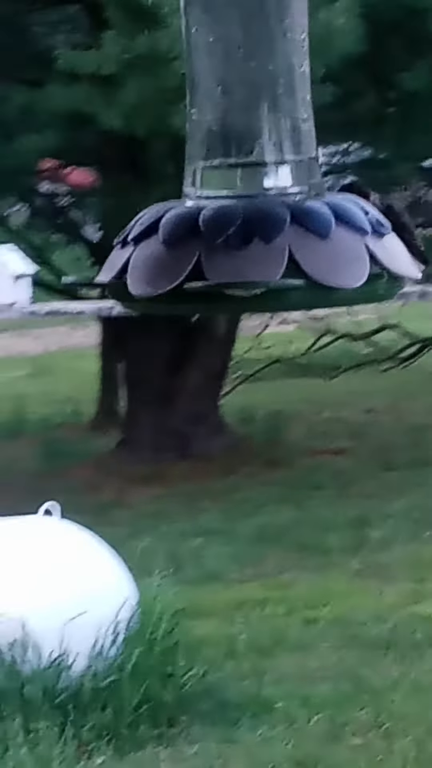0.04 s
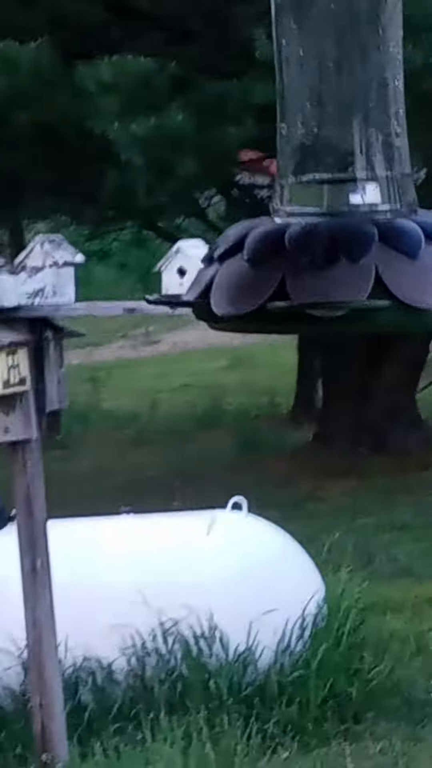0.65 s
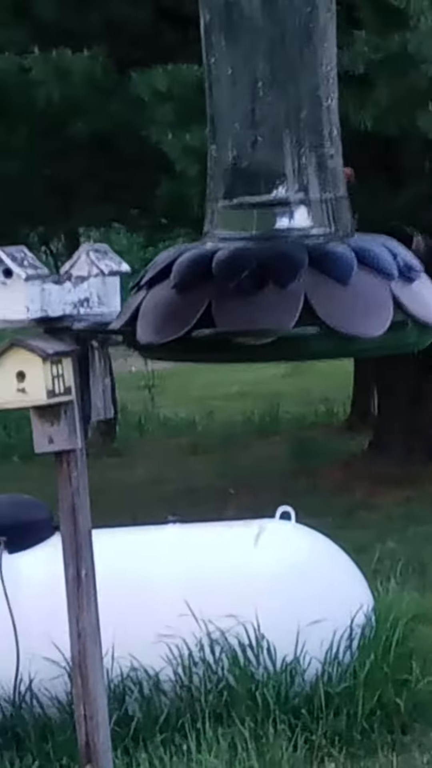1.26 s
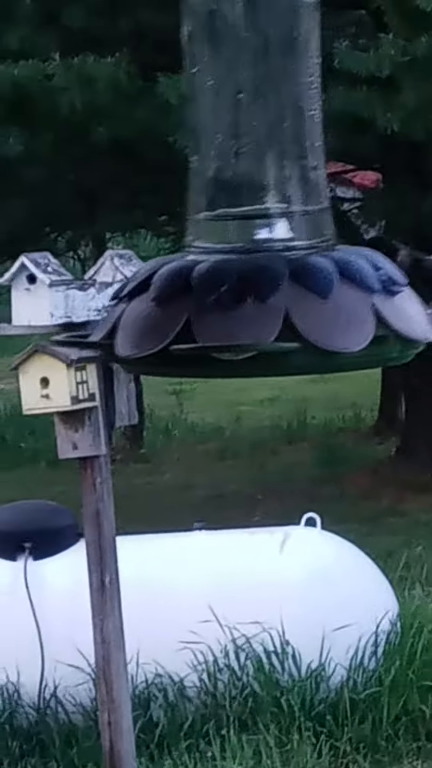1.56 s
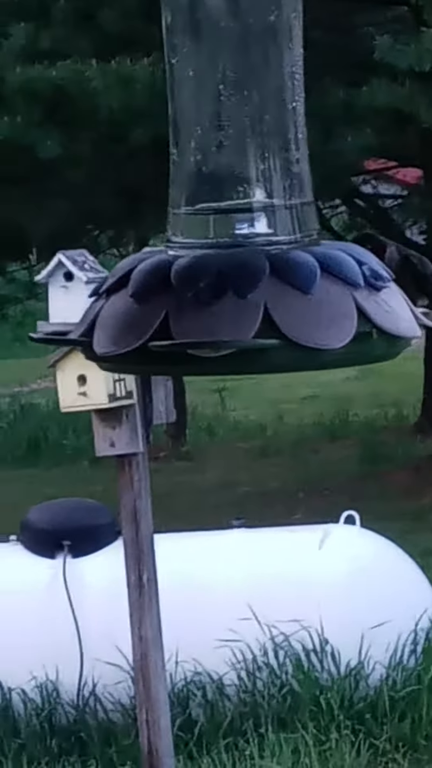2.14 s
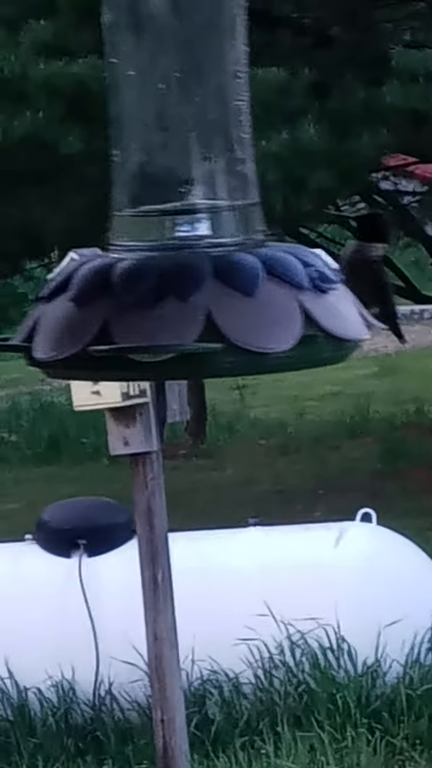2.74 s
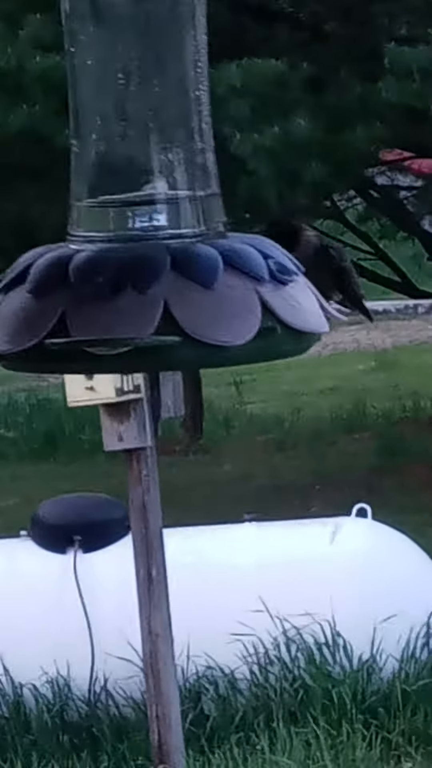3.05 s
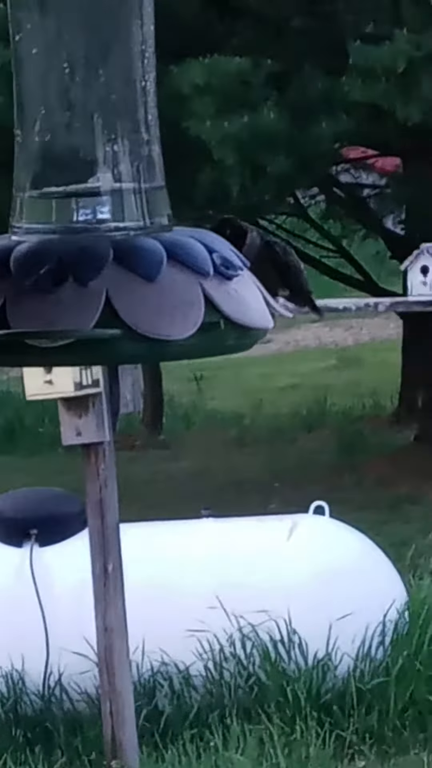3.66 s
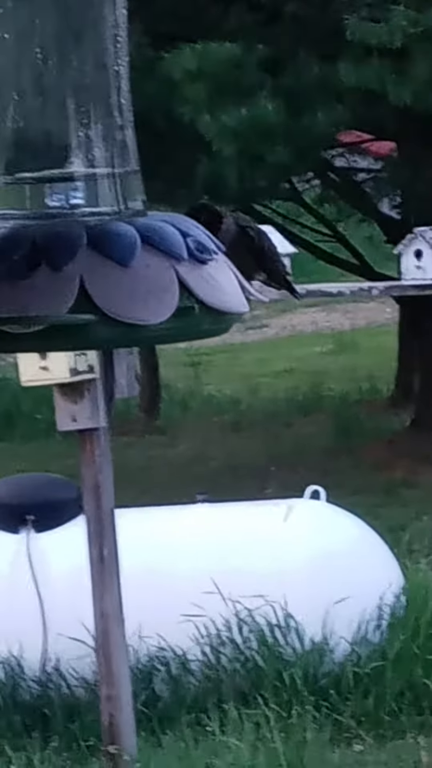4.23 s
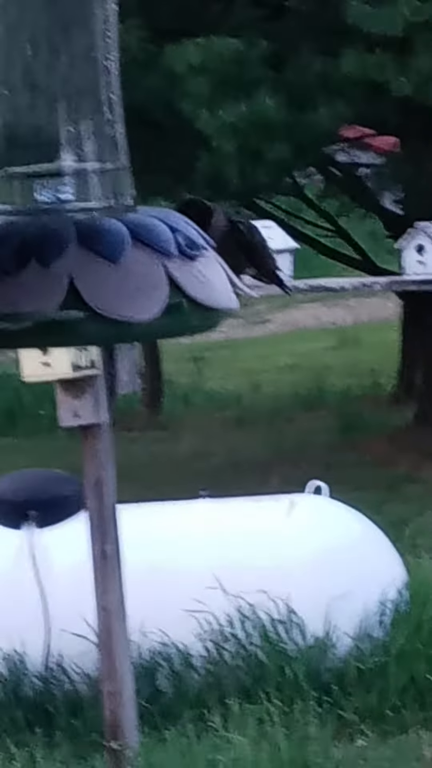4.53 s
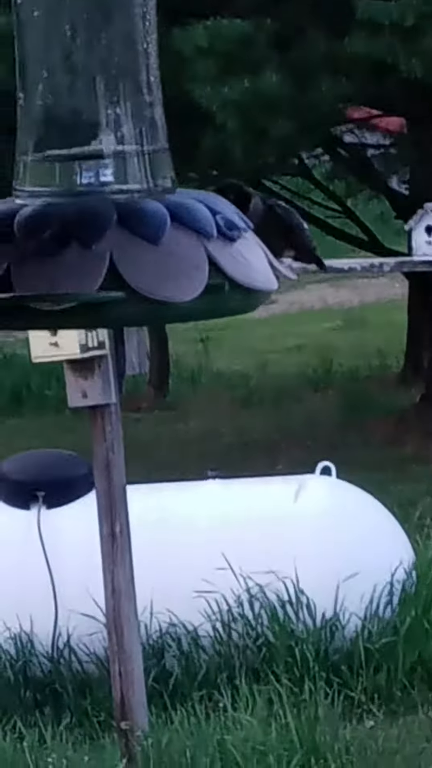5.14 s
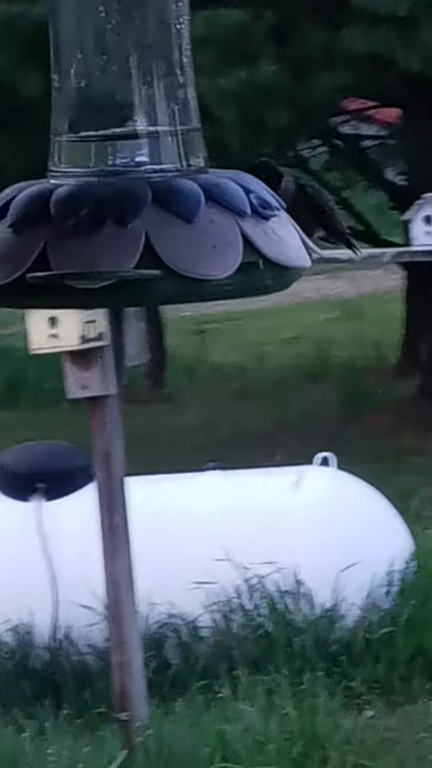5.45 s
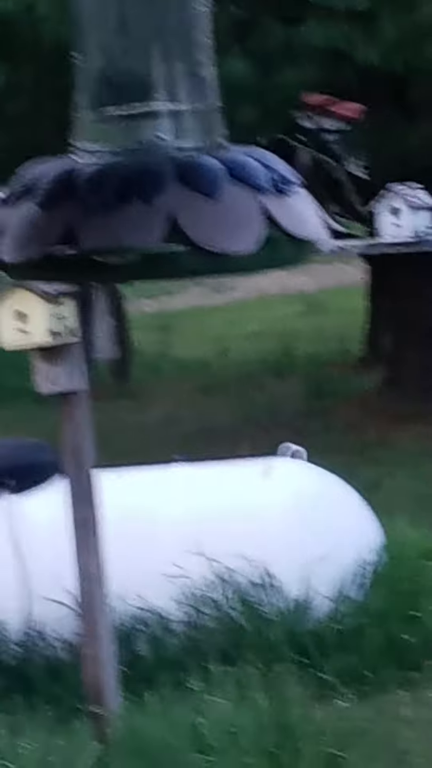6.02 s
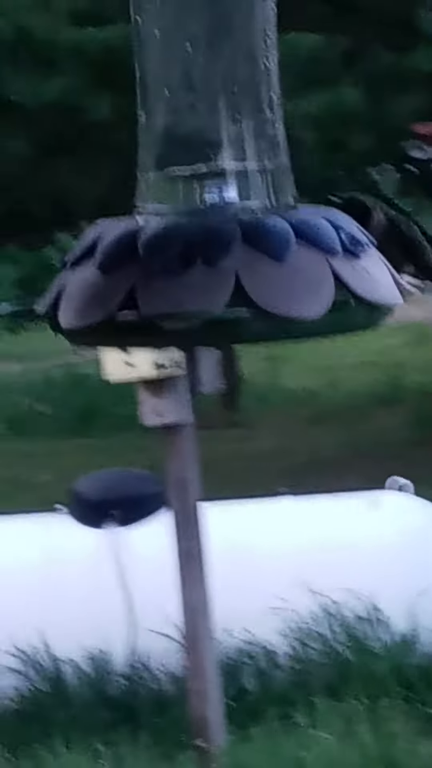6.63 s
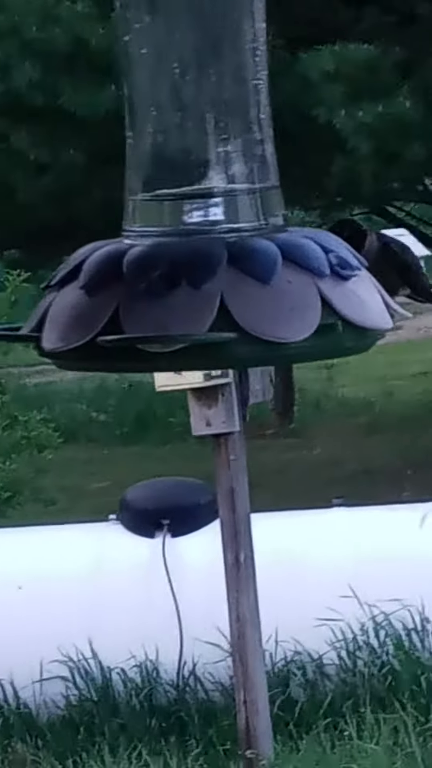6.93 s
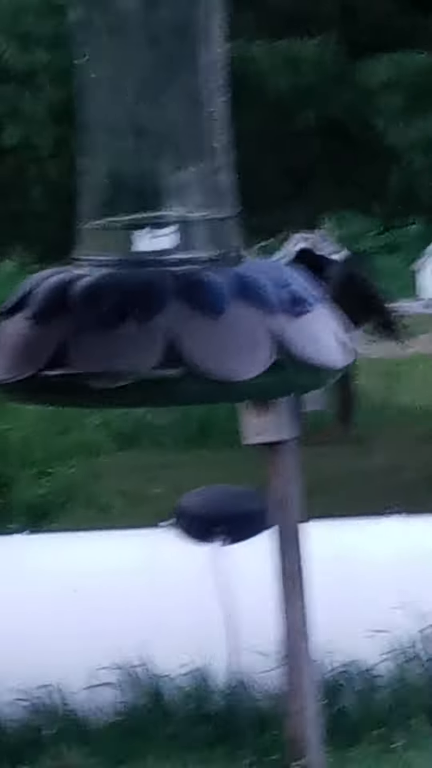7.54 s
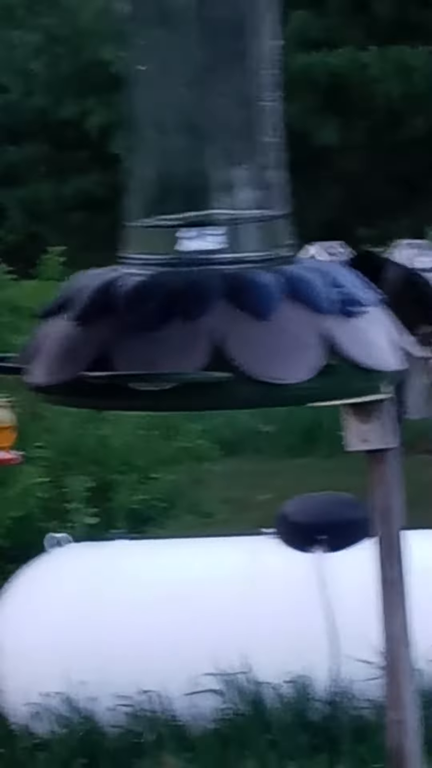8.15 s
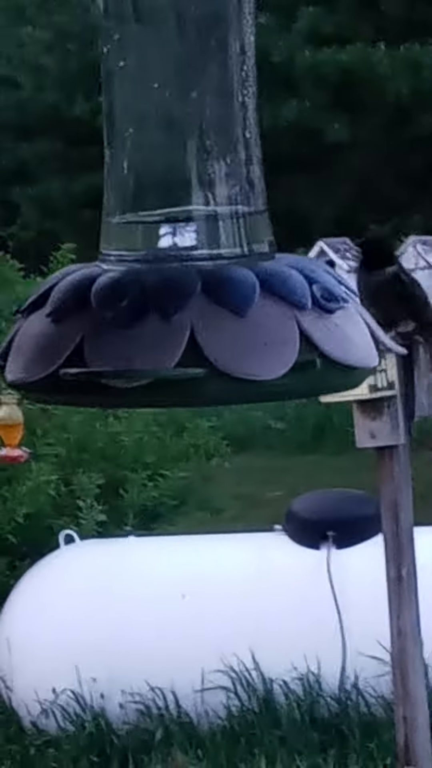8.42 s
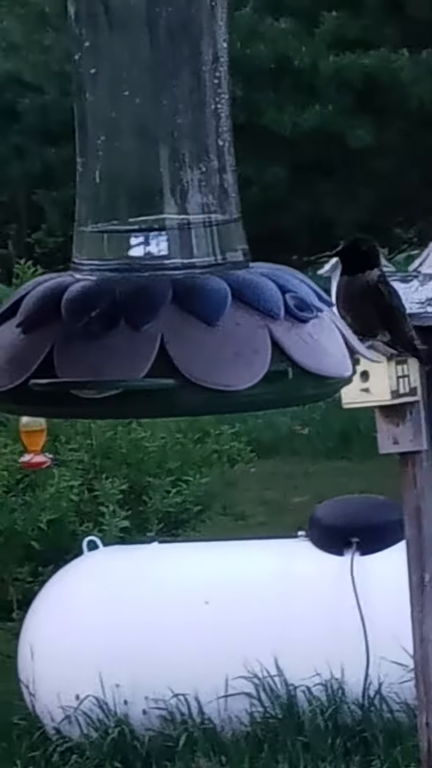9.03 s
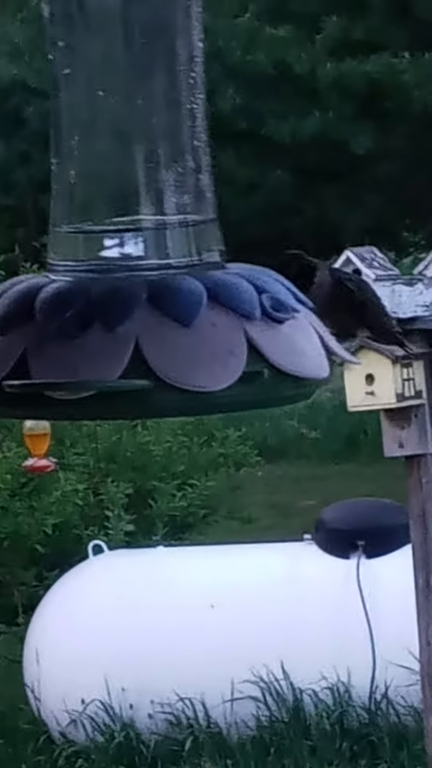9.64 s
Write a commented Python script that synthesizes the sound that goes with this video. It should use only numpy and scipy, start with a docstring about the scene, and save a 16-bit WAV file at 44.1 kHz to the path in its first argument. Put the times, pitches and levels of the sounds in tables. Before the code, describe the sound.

Songbirds whistle, chirp and trill around a quiet yard, with a few handling clicks and one hard knock near the microphone.

```python
"""Songbirds whistle, buzz and trill in a tree-lined yard, heard from beside a feeder.
Each note is a gliding near-sine, roughened by flutter of the syrinx and scattered by walls and trees.
Under the birds lie a soft wash of air and the faint hum of a machine. The hand-held camera creaks,
ticks and bumps, and once knocks hard against something close by, which rings and clatters."""
import sys
import numpy as np
from scipy import signal
from scipy.fft import rfft, irfft, next_fast_len
from scipy.io import wavfile
from scipy.ndimage import uniform_filter1d

SR = 44100
rng = np.random.default_rng(int(sys.argv[2]) if len(sys.argv) > 2 else 0)


def transcribe(u):
    """Save the signal u as a 16-bit wav file named by the first command-line argument.

    u: samples, shape (n,) or (channels, n), limited to [-1, 1]; the rate is SR.
    q: integer samples, one column per channel.
    """
    v = np.clip(np.atleast_2d(u).T, -1, 1)
    q = np.round(v * 32767).astype(np.int16)
    wavfile.write(sys.argv[1], SR, q)


N = 435708
TIME = np.arange(N) / SR


def amp(db):
    """Decibels to gain."""
    return 10 ** (np.asarray(db) / 20)


def unit_rms(x):
    """Scales to rms 1."""
    return x / np.sqrt(np.mean(x ** 2) + 1e-20)


def at_hz(points, hz):
    """Interpolates a (frequency, value) table on a log-frequency axis."""
    f, value = np.transpose(points)
    return np.interp(np.log(hz + 1), np.log(f + 1), value)


def add(mix, s, sound):
    """Mixes a sound in at time s."""
    part = mix[max(round(s * SR), 0):][:len(sound)]
    part += sound[:len(part)]


def wander(hz, size):
    """Smooth noise of rms 1, rolled off above hz."""
    padded = next_fast_len(size, True)
    lowpass = np.exp(-np.minimum(np.fft.rfftfreq(padded, 1 / SR) / hz, 10) ** 2)
    return unit_rms(irfft(rfft(rng.standard_normal(padded)) * lowpass, padded)[:size])


def impulse(db):
    """Minimum-phase impulse with this spectrum."""
    cepstrum = irfft(np.log(amp(np.maximum(db, db.max() - 90))))
    half = len(cepstrum) // 2
    cepstrum[1:half] *= 2
    cepstrum[half + 1:] = 0
    return irfft(np.exp(rfft(cepstrum)))


def air(patch_db=2.5, drift_db=0.8):
    """Soft wash of the open yard: noise in shifting spectral patches."""
    colour = [(20, -28.5), (45, -6.5), (70, -5), (130, -10), (220, -13.5), (380, -16.5), (760, -18.5),
              (1050, -23.5), (2000, -25), (3200, -23), (4400, -21), (5100, -35.5), (9500, -31.5),
              (15800, -38)]  # wash spectrum (frequency [Hz], density [dB])
    levels = [(0, -68.5), (1.2, -64.5), (1.9, -69), (3, -66), (5.5, -66.5), (6.5, -63.5), (7.8, -68),
              (8.5, -67), (9.88, -65.5)]  # wash envelope (time [s], level [dB])
    hz = np.fft.rfftfreq(1024, 1 / SR)
    real, imag, patches = rng.standard_normal((3, len(hz), N // 256 + 5))
    patches = unit_rms(uniform_filter1d(uniform_filter1d(patches, size=6, axis=0), size=14, axis=1))
    frames = (real + 1j * imag) * amp(at_hz(colour, hz)[:, None] + patch_db * patches)
    wash = unit_rms(signal.istft(frames, nperseg=1024, noverlap=768)[1][:N])
    return wash * amp(np.interp(TIME, *np.transpose(levels)) + drift_db * wander(5.6, N))


def hum(waver_share=0.006, tremble_db=2):
    """Close low tones of a machine waver together, beat and tremble."""
    partials = [(53.4, -71), (66.1, -68), (68.8, -71), (83, -76), (269, -85)]  # machine tones (frequency [Hz], relative level [dB])
    gains = [(0, 1), (.7, 3), (1.6, 1.5), (2.0, -6), (2.9, 3), (4.3, -2), (5.2, -8), (6.4, 1.5), (7.2, -3),
             (8.4, -2.5), (9.0, -9), (9.88, 2)]  # hum envelope (time [s], gain [dB])
    run_s = np.cumsum(1 + waver_share * wander(6, N)) / SR
    tones = sum(amp(db) * np.sin(2 * np.pi * (rng.random() + hz * run_s)) for hz, db in partials)
    return 1.25 * tones * amp(np.interp(TIME, *np.transpose(gains)) + tremble_db * wander(16, N))


def case_ticks(ring_db=-12, ring_s=0.0046):
    """Each slip of the camera case is a sharp snap with a faint, short ring."""
    slips = [(0.396, -48.5), (6.7606, -30), (6.7867, -26), (6.7939, -21), (6.8066, -28.5), (6.8259, -34),
             (6.879, -30), (6.8906, -35), (7.196, -40), (7.5685, -21.5), (7.583, -27), (7.595, -24)]  # case slips (time [s], snap peak [dB])
    colour = [(300, -27.5), (1200, -13), (4000, 5), (5500, -6.5), (9000, 5), (12000, -5), (16000, -13.5)]  # snap spectrum (frequency [Hz], level [dB])
    out, t = np.zeros(N), TIME[:2048]
    snap = impulse(at_hz(colour, np.fft.rfftfreq(len(t), 1 / SR)))
    for s, db in slips:
        ring = rng.standard_normal(len(t)) * np.exp(-t / ring_s)
        tick = snap + amp(ring_db) * signal.fftconvolve(snap, ring / np.linalg.norm(ring))[:len(t)]
        add(out, s, amp(db) * tick / abs(snap).max())
    return out


def case_bumps(blow_db=5, thump_hz=190, thump_s=0.0053):
    """A scuff swells into a blunt blow on the case, which rings briefly over a low thump."""
    body = [(25, -43.5), (60, -17), (130, -9.5), (300, -2), (800, -4.5), (1400, -4), (3000, -6.5),
            (4200, -1.5), (5200, -12.5), (8500, -12.5), (15500, -20)]  # case spectrum (frequency [Hz], density [dB])
    thumps = [(0.919, -48, 0), (2.995, -55, -4.5), (5.848, -48.5, -5.5), (7.357, -58, -2.5)]  # hand on the case (time [s], level [dB], tilt [dB/octave])
    scuffs = [(6.247, -53, -5.5), (6.497, -53.5, -9), (6.563, -56.5, -12.5), (6.607, -58.5, -0.5),
              (6.786, -53.5, 5.5), (7.485, -57, 2), (7.526, -56, -3), (7.569, -45, 2),
              (7.5814, -40.5, -1.3), (9.783, -53, -23)]  # fingers on the case (time [s], level [dB], tilt [dB/octave])
    clacks = [(4.7249, -34, 11), (4.7297, -47.5, 24), (7.6, -35, -5.5)]  # hard contacts (time [s], level [dB], extra blow gain [dB])
    out, lead, size = np.zeros(N), 4096, 16384
    hz, t = np.fft.rfftfreq(size, 1 / SR), (np.arange(size) - lead) / SR
    octaves = np.log2(np.maximum(hz, 60) / 1000)
    thump = np.sin(2 * np.pi * thump_hz * t[lead:]) * np.exp(-t[lead:] / thump_s)

    def touch(s, db, tilt_db, swell_s, t60_s, sharp_db, top_hz, thump_db):
        """One contact; the blow lands at time s."""
        colour_db = at_hz(body, hz) + tilt_db * octaves - 10 * np.log10(1 + (hz / top_hz) ** 24)
        sound = unit_rms(irfft(amp(colour_db) * np.exp(2j * np.pi * rng.random(len(hz)))))
        sound *= np.where(t < 0, 0.16 * np.exp(-abs(t) / swell_s), 1000 ** (-abs(t) / t60_s))
        blow = impulse(colour_db)[:size - lead]
        sound[lead:] += amp(blow_db + sharp_db) * blow / abs(blow).max() + amp(thump_db) * thump
        add(out, s + t[0], amp(db) * sound)

    for row in thumps:
        touch(*row, swell_s=0.01, t60_s=0.15, sharp_db=-1, top_hz=5500, thump_db=11.5)
    for row in scuffs:
        touch(*row, swell_s=0.006, t60_s=0.31, sharp_db=-6.5, top_hz=11000, thump_db=-8)
    for s, db, sharp_db in clacks:
        touch(s, db, -0.3, swell_s=0.0074, t60_s=0.08, sharp_db=sharp_db, top_hz=8595, thump_db=-21.5)
    return out


def knock(start_s=7.6016, push_s=0.00038, thud_hz=210, thud_s=0.0038, hold_s=0.018, fall_db_per_s=329):
    """The camera strikes something: pressure kick, dead thud, then ringing modes over a dense clatter."""
    modes = [(186, -10.5, 0.082), (453, -10.5, 0.19), (550, -11, 0.098), (658, -2.5, 0.12),
             (875, -1.5, 0.069), (1125, -5.5, 0.1), (1180, -5.5, 0.12), (1342, -6.5, .14),
             (1620, -7.5, 0.2), (1790, -2, .16), (2013, -13, .2), (2344, -6, 0.16), (2810, -8.5, 0.15),
             (3080, -9, 0.2), (3680, -9, 0.21), (3790, -6.5, .16)]  # struck object (frequency [Hz], relative level [dB], T60 [s])
    colour = [(40, -30.5), (150, -11.5), (400, -1.5), (1000, -0.5), (2000, -2), (3000, -2.5), (4100, -1),
              (5000, -9.5), (6500, -10), (9000, -8), (12000, -13), (15500, -16)]  # clatter spectrum (frequency [Hz], density [dB])
    out, t = np.zeros(N), TIME[:SR // 2]
    u = t / push_s - 2
    push = amp(-10) * u * np.exp((1 - u ** 2) / 2)
    late_s = np.maximum(t - push_s, 0)
    thud = amp(-12) * np.sin(2 * np.pi * thud_hz * late_s) * np.exp(-late_s / thud_s)
    kick = signal.sosfilt(signal.butter(2, 90, "high", fs=SR, output="sos"), push + thud)
    ring = sum(amp(db) * 1000 ** (-t / t60_s) * np.sin(2 * np.pi * (hz * t + rng.random()))
               for hz, db, t60_s in modes)
    spectrum = amp(at_hz(colour, np.fft.rfftfreq(len(t), 1 / SR)))
    clatter = unit_rms(irfft(rfft(rng.standard_normal(len(t))) * spectrum, len(t)))
    dying_s = np.maximum(t - hold_s, 0)
    drop_db = 5.5 * np.minimum(dying_s / 0.0054, 1)
    clatter *= amp(-19.5 - drop_db - fall_db_per_s * dying_s)
    attack = 1 - np.exp(-t / 0.00085)
    add(out, start_s, kick + (amp(-24) * ring + clatter) * attack)
    return out


def echoes(x, near_s, far_db, echoes_per_s=1500):
    """Near walls return an early cluster; trunks and branches scatter a longer, uneven tail."""
    decay = [(1500, .9), (3000, 0.83), (4500, .9), (6000, 0.6), (8000, 0.42)]  # yard reverberation (frequency [Hz], T60 [s])
    t = TIME[:SR]
    near, far = rng.standard_normal((2, SR)) * (rng.random((2, SR)) < echoes_per_s / SR)
    near = near * np.exp(-t / near_s) * (t > 0.006)
    far = far * (1 - np.exp(-t / 0.02)) * amp(3.4 * wander(11, SR))
    hz, frame_s, frames = signal.stft(far, SR, nperseg=256)
    frames *= 1000 ** (-frame_s / at_hz(decay, hz)[:, None])
    far = signal.istft(frames, SR, nperseg=256)[1][:SR]
    path = near / np.linalg.norm(near) + amp(far_db) * far / np.linalg.norm(far)
    return signal.fftconvolve(x, path / np.linalg.norm(path))[:N]


def echo_share(db, even_db, spread_db):
    """Share of power arriving as echo: the fainter the call, the more hidden the bird."""
    return 0.5 - 0.5 * np.tanh((db - even_db) / spread_db)


def whistle(length_s, start_hz, middle_hz, end_hz, rasp_hz, db, flutter_hz=110, tremble_db=2, fade=0.34):
    """Near-sine note on a curved glide; flutter of the syrinx turns it into a warble or buzz."""
    size = int(np.clip(length_s * SR, 64, SR // 2))
    parabola = np.polyfit([0, 0.5, 1], [start_hz, middle_hz, end_hz], 2)
    glide_hz = np.polyval(parabola, np.linspace(0, 1, size))
    pitch_hz = glide_hz + 1.3 * rasp_hz * np.tanh(wander(flutter_hz, size + 4096)[:size])
    swell = signal.windows.tukey(size, fade) * amp(tremble_db * wander(66, size + 4096)[:size])
    return amp(db) * unit_rms(swell * np.sin(2 * np.pi * np.cumsum(pitch_hz) / SR))


def from_trees(notes, even_db, edge_db, near_s, far_db, flutter_hz, tremble_db, edge_delay_s=0.17):
    """Notes arrive direct, scattered, and once more, blurred, off the far edge of the yard."""
    direct, scattered = np.zeros((2, N))
    for s, *shape, db in notes:
        note = whistle(*shape, db, flutter_hz, tremble_db)
        share = echo_share(db, even_db, spread_db=34.5)
        add(direct, s, np.sqrt(1 - share) * note)
        add(scattered, s, np.sqrt(share) * note)
        add(scattered, s + edge_delay_s, amp(edge_db) * note)
    return direct + echoes(scattered, near_s, far_db)


def repeats(call, times, gain_db):
    """Notes of a set call, each time it is sung."""
    return [(s + delay_s, *shape, db + note_db + gain_db)
            for s, db in times for delay_s, *shape, note_db in call]


def series(count, start_s, gap_s, peak_s, peak_db, rise_db_per_s, fall_db_per_s, slowing_s=0):
    """Times and levels of a run of syllables that swells and fades."""
    k = np.arange(count)
    s = start_s + gap_s * k + slowing_s * k ** 2
    return zip(s, peak_db - np.maximum(rise_db_per_s * (peak_s - s), fall_db_per_s * (s - peak_s)))


def waver_hz(db):
    """Pitch scatter of a held note; doubles for each 7 dB fainter."""
    return 22 * 2 ** ((-57.5 - db) / 7)


def chorus(glide_share=0.038):
    """Many far birds call at random, heard only as echo."""
    bands = [(2140, 3200, 8, -79), (3610, 4550, 8.5, -77.5), (6430, 8400, 10, -80), (8500, 11500, 9, -85)]  # far birds (low [Hz], high [Hz], rate [notes/s], base level [dB])
    out = np.zeros(N)
    for low_hz, high_hz, per_s, db in bands:
        for when, pitch, length, slope, faintness in rng.random((200, 5))[:int(per_s * N / SR)]:
            size = int((0.032 + 0.041 * length) * SR)
            glide = 1 + glide_share * (2 * slope - 1) * np.linspace(-1, 1, size)
            hz = (low_hz + pitch * (high_hz - low_hz)) * glide
            note = np.hanning(size) * np.sin(2 * np.pi * np.cumsum(hz) / SR)
            add(out, when * N / SR, amp(db - 3 * np.log(faintness + 0.018)) * note)
    return echoes(out, near_s=0.025, far_db=-3)


def buzzes(rasp_hz=250.8, sag_hz=89.7, gain_db=1):
    """Rough, sagging warbles from deep in the wood, heard only as echo."""
    warbles = [(.165, 0.1, 2680, -68.5), (0.224, 0.27, 1683, -66.5), (.911, 0.17, 7100, -75),
               (0.929, 0.43, 3240, -66.5), (.95, .3, 2600, -69), (2.905, 0.049, 3200, -52.5),
               (2.877, 0.079, 4410, -69), (3.009, .25, 2512, -62), (3.3, .24, 1640, -68),
               (3.714, 0.089, 2423, -55.5), (5.988, 0.087, 1646, -68), (6.447, .2, 2518, -61.5),
               (8.465, .22, 2268, -70.5), (8.553, 0.3, 1660, -77), (9.297, .14, 2296, -65)]  # buzzy notes (time [s], length [s], pitch [Hz], level [dB])
    deep = np.zeros(N)
    for s, length_s, hz, db in warbles:
        add(deep, s - 0.012, whistle(length_s, hz + sag_hz, hz, hz - sag_hz, rasp_hz, db + gain_db))
    return echoes(deep, near_s=0.014, far_db=-5)


def seeps(gain_db=1, waver_share=0.6):
    """Thin, very high calls on a nearly straight glide."""
    calls = [(1.287, .1, 7100, 7120, -71), (1.979, 0.085, 7460, 7300, -69.5),
             (2.382, .11, 7310, 7210, -64.5), (3.08, 0.1, 7120, 6960, -78), (3.137, 0.06, 5575, 5370, -72),
             (6.25, .11, 7120, 7070, -71), (6.624, 0.135, 7800, 8040, -58),
             (6.977, 0.18, 7640, 7930, -60.5), (7.881, 0.069, 7080, 7050, -70),
             (9.58, .06, 7970, 7880, -74.5)]  # high calls (time [s], length [s], start [Hz], end [Hz], level [dB])
    notes = [(s, length_s, start, (start + end) / 2, end, waver_share * waver_hz(db), db + gain_db)
             for s, length_s, start, end, db in calls]
    return from_trees(notes, even_db=-63, edge_db=-26.5, near_s=0.023, far_db=-6,
                      flutter_hz=110.2, tremble_db=2.5)


def rattle():
    """An even run of falling chips that grows slowly and dies quickly."""
    chips = np.zeros(N)
    for s, db in series(16, start_s=3.208, gap_s=0.0465, peak_s=3.7, peak_db=-57.5,
                        rise_db_per_s=11.5, fall_db_per_s=50):
        add(chips, s, whistle(0.0151, 4170, 3347, 3260, rasp_hz=113, db=db, tremble_db=3))
    return chips + echoes(chips, near_s=0.015, far_db=-6)


def trill():
    """A high two-stroke trill swells into the open and fades, slowing a little."""
    # one syllable (delay [s], length [s], start [Hz], middle [Hz], end [Hz], rasp [Hz], level [dB])
    strokes = [(-.026, 0.02, 8100, 7240, 6800, 40.05, -14), (.001, 0.0238, 6760, 6080, 5160, 40, -3)]
    direct, scattered = np.zeros((2, N))
    for s, db in series(13, start_s=8.041, gap_s=0.1432, peak_s=9.0, peak_db=-54.5,
                        rise_db_per_s=15.5, fall_db_per_s=21, slowing_s=0.00057):
        share = echo_share(db, even_db=-58, spread_db=12)
        for delay_s, *shape, stroke_db in strokes:
            stroke = whistle(*shape, db + stroke_db, fade=0.78)
            add(direct, s + delay_s, np.sqrt(1 - share) * stroke)
            add(scattered, s + delay_s, np.sqrt(share) * stroke)
    return direct + echoes(scattered, near_s=0.026, far_db=-14)


def chiming_bird():
    """One bird sings three chimes and two hooked whistles, echoed by the far edge of the yard."""
    # two-note calls (delay [s], length [s], start [Hz], middle [Hz], end [Hz], rasp [Hz], level [dB])
    chime = [(0, .042, 4783, 4705, 4650, 28, -3.1), (.044, .061, 3187, 3356, 3335, 24.2, 0)]
    hook = [(0, .064, 4430, 4350, 4266, 5, 0), (.055, .03, 4230, 3670, 3146, 35, 0.99)]
    # when each is sung (time [s], level [dB])
    chime_times = [(5.690, -58.5), (6.104, -55), (6.445, -52.5)]
    hook_times = [(6.825, -46), (7.219, -47.5)]
    notes = repeats(chime, chime_times, gain_db=3) + repeats(hook, hook_times, gain_db=0)
    return from_trees(notes, even_db=-58, edge_db=-12.5, near_s=0.017, far_db=-4.5,
                      flutter_hz=90, tremble_db=1.5)


def songs(gain_db=1, arch_hz=25, mid_slur_share=0.189):
    """From the near trees: slightly arched whistles, slurs that drop fast and level off, steep dives."""
    whistles = [(.594, .051, 2280, -59), (0.663, 0.078, 2354, -61), (0.687, 0.1, 3200, -56),
                (.765, 0.085, 2863, -46), (.88, 0.029, 2886, -51), (1.765, .11, 3030, -75),
                (2.145, 0.12, 3045, -67), (2.261, 0.014, 3430, -53.5), (2.435, .073, 2242, -60.5),
                (2.677, 0.068, 3160, -55.5), (2.912, 0.027, 3287, -58), (3.117, 0.052, 1948, -57),
                (3.562, 0.038, 2940, -51), (4.345, 0.051, 2177, -59), (4.673, 0.06, 2250, -60),
                (4.733, 0.026, 2854, -49), (4.884, 0.046, 2100, -58.5), (5.125, .085, 2244, -64),
                (5.716, 0.07, 2260, -58), (5.957, 0.16, 4445, -60.5), (6.218, 0.12, 4445, -63),
                (6.533, .13, 4345, -60), (6.956, .11, 2834, -55.5), (7.074, .085, 2204, -67.5),
                (7.882, 0.16, 2300, -72), (9.164, .049, 3000, -63.5)]  # held notes (time [s], length [s], pitch [Hz], level [dB])
    slurs = [(.112, 0.062, 3350, 3085, -60), (0.119, 0.072, 2480, 2225, -62),
             (.731, 0.051, 3437, 2850, -49.5), (1.244, 0.09, 2770, 2186, -61),
             (1.365, 0.0587, 2630, 2180, -66), (2.281, 0.035, 3190, 2440, -55.5),
             (2.333, 0.096, 2470, 1880, -61.5), (2.862, .055, 2880, 2574, -49),
             (2.866, .045, 6930, 4700, -71), (2.944, 0.059, 2900, 2479, -50), (3, .063, 2564, 2333, -60.5),
             (3.207, 0.074, 2074, 1885, -56), (3.601, .048, 2850, 2400, -48),
             (3.649, 0.055, 2230, 2100, -56), (3.79, 0.056, 2150, 1924, -63.5),
             (4.765, 0.087, 2650, 2093, -55.5), (4.977, 0.089, 3140, 2850, -56.5),
             (9.203, 0.0348, 2790, 2440, -58.5)]  # falling notes (time [s], length [s], top [Hz], low [Hz], level [dB])
    # two-note call (delay [s], length [s], start [Hz], middle [Hz], end [Hz], rasp [Hz], level [dB])
    dive = [(0, .07, 3516, 2826, 1900, 14, -1.5), (.084, 0.0925, 2180, 2042, 2030, 16, -6.5)]
    dive_times = [(4.153, -48.5), (9.731, -52.5)]  # when it is sung (time [s], level [dB])
    slur_rasp_hz = 36
    notes = [(s, length_s, hz - arch_hz, hz + arch_hz / 2, hz - arch_hz, waver_hz(db), db + gain_db)
             for s, length_s, hz, db in whistles]
    notes += [(s, length_s, top, low + mid_slur_share * (top - low), low, slur_rasp_hz, db + gain_db)
              for s, length_s, top, low, db in slurs]
    notes += repeats(dive, dive_times, gain_db)
    return from_trees(notes, even_db=-57, edge_db=-21.5, near_s=0.018, far_db=-6,
                      flutter_hz=85, tremble_db=2.5)


def scene():
    """Birds in the yard, handling noise at the microphone, air and hum under both."""
    birds = songs() + seeps() + chiming_bird() + buzzes() + rattle() + trill() + chorus()
    return (birds + case_ticks() + case_bumps() + knock() + air() + hum())[None]


def record(dry):
    """Microphone bass roll-off, then the recorder's band limit."""
    low_hz, top_hz = 52, 15780
    lean = signal.sosfilt(signal.butter(3, low_hz, "high", fs=SR, output="sos"), dry)
    lowpass = signal.firwin(511, top_hz, window=("kaiser", 9), fs=SR)
    return signal.oaconvolve(lean, lowpass[None], "same")


dry = scene()
out = record(dry)
transcribe(out)
```